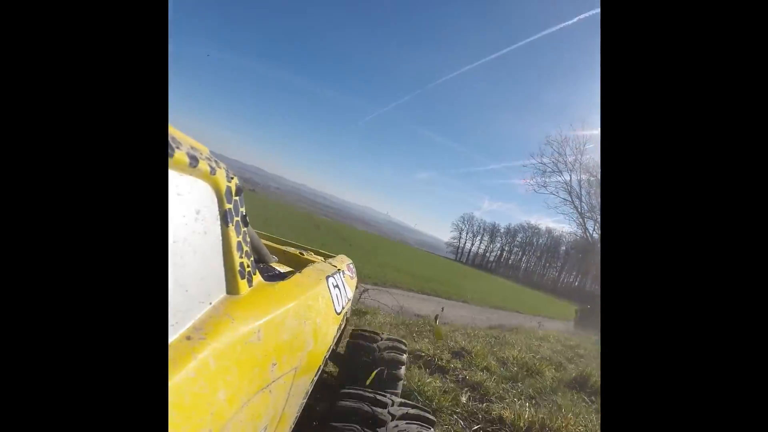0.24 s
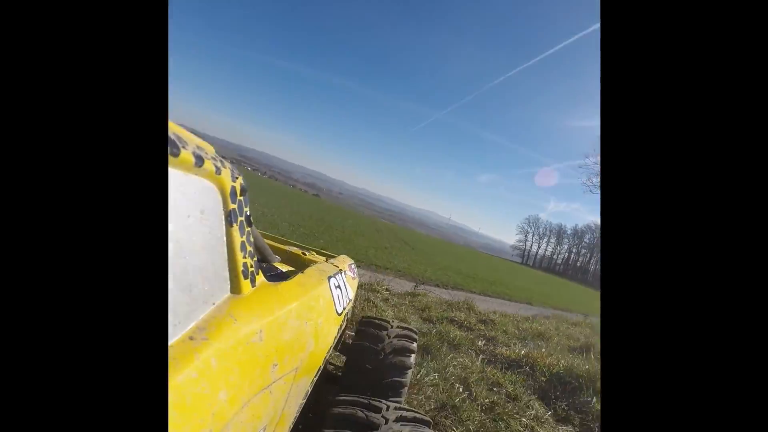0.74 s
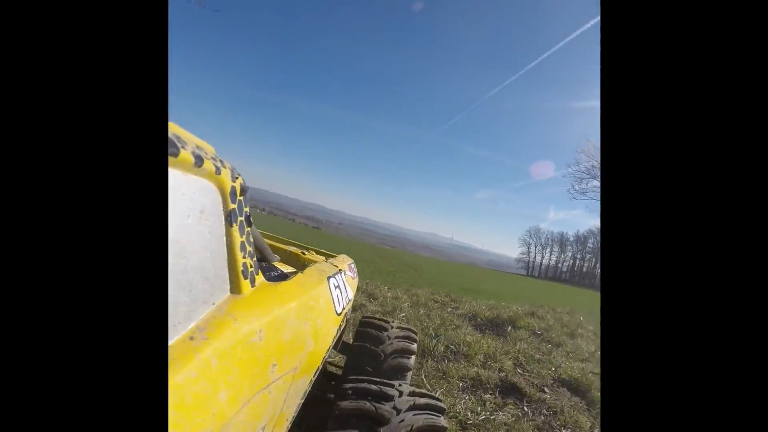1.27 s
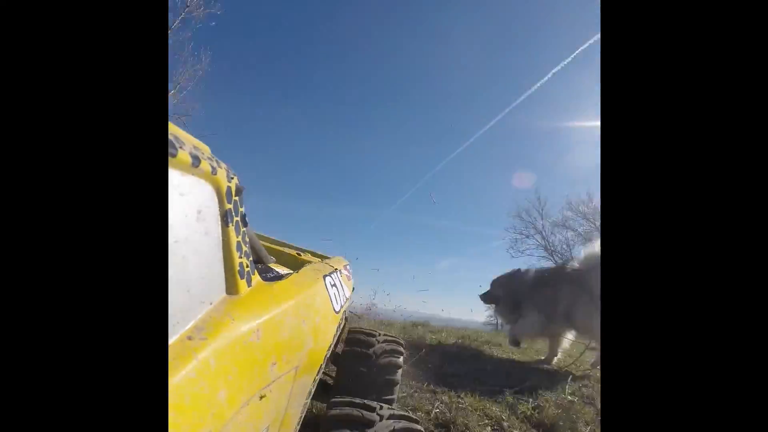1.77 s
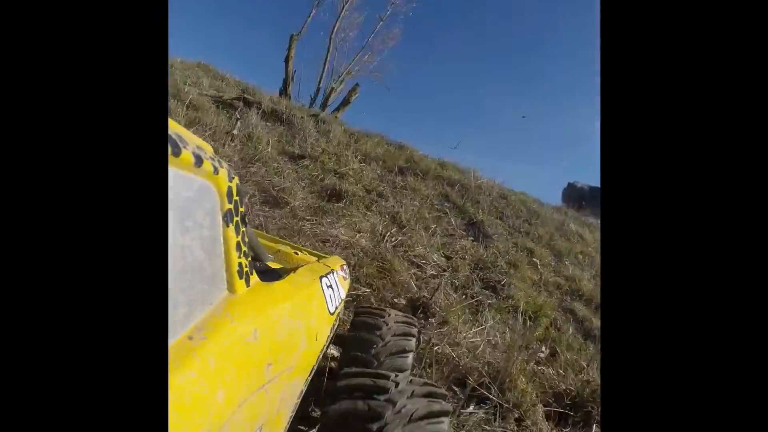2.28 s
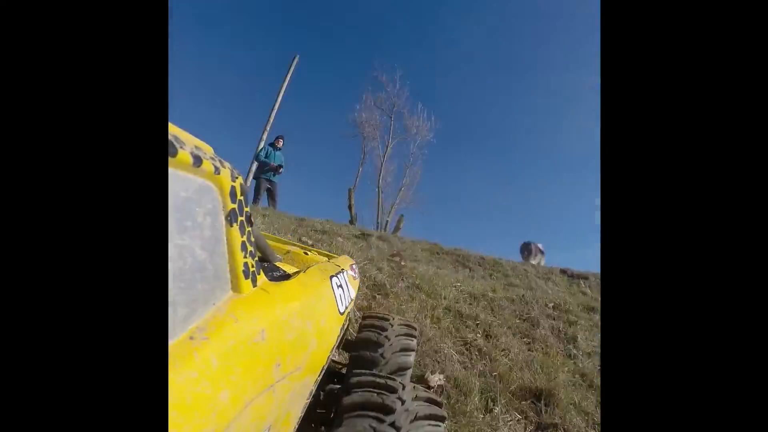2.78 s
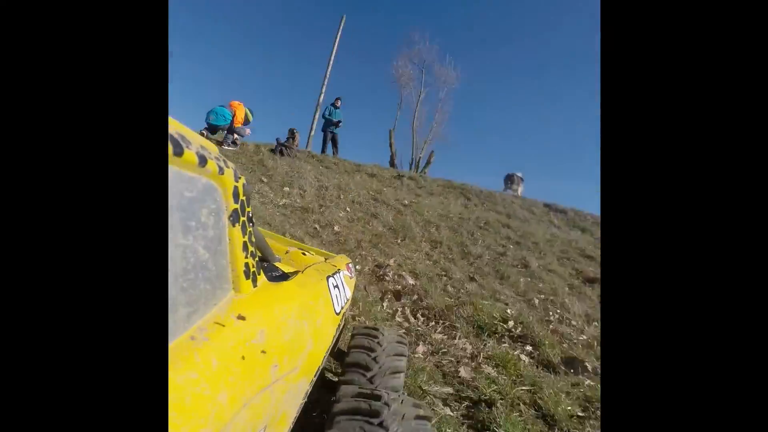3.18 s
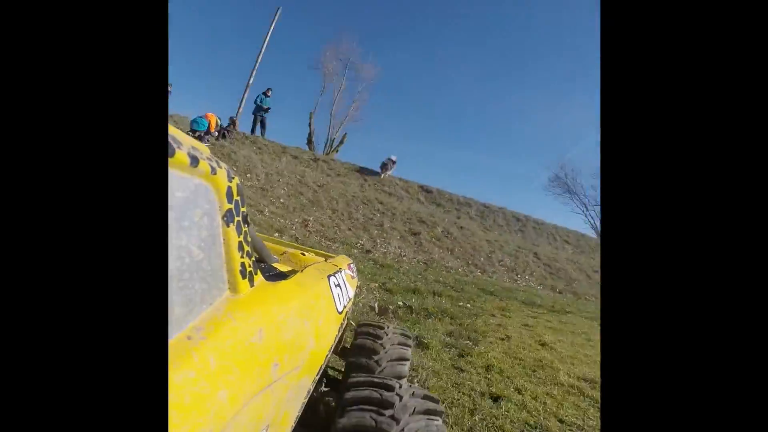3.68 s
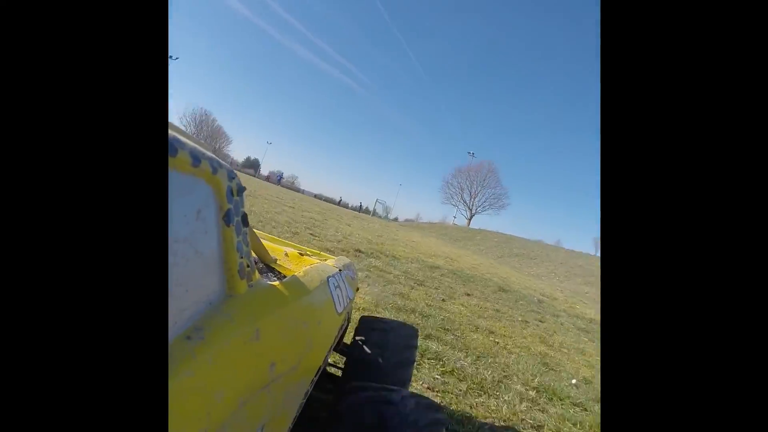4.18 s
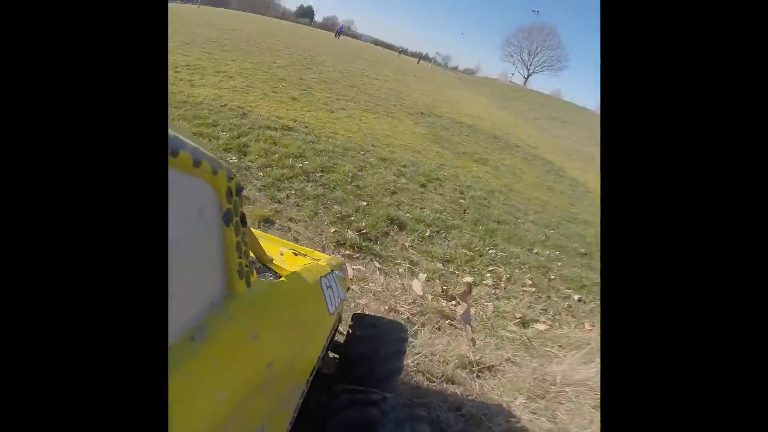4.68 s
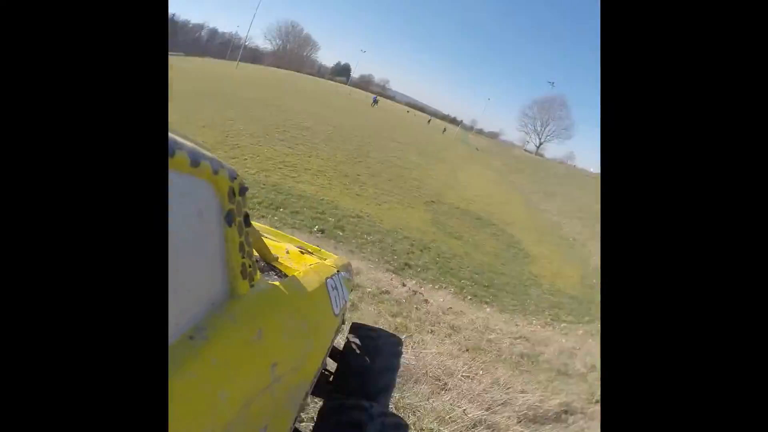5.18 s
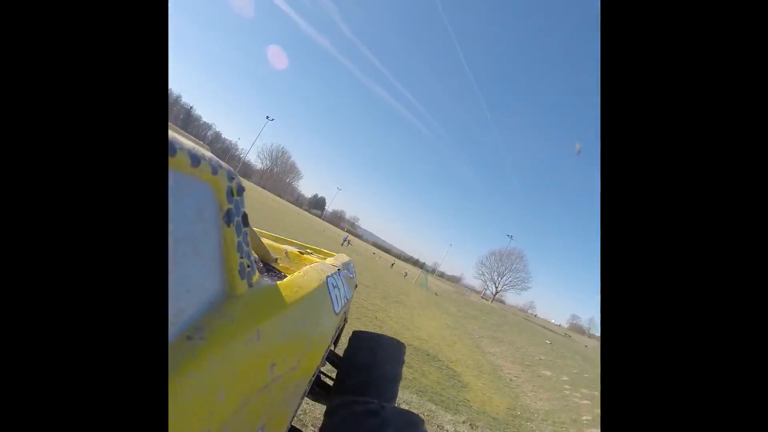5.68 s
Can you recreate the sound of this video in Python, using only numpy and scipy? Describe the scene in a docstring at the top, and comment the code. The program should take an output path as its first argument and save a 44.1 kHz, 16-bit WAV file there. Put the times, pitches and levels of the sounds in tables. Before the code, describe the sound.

A small electric toy truck whines and buzzes in throttle bursts over a bumpy grassy bank, with deep rumble, plastic knocks and metallic jingles.

```python
"""A small electric toy truck buzzes and whines over a grassy bank, heard through a case riding on its body.
Throttle squeezes set the shaft speed, which turns repeating gear patterns, tooth tones and shaft hum.
Filtered noise makes the chassis rumble and tyre boom, and short noise bursts the knocks.
Decaying sine modes make a loose metal part jingle; tiny noise bursts flick grit against the case.
The speed controller adds a thin whistle and the body shell booms under surges of torque."""
import sys
import numpy as np
from scipy import signal
from scipy.fft import rfft, irfft
from scipy.io import wavfile
from scipy.ndimage import uniform_filter1d, map_coordinates

SR = 44100
rng = np.random.default_rng(int(sys.argv[2]) if len(sys.argv) > 2 else 0)


def master_out(mix):
    """Clip the mix to full scale and print it as 16-bit PCM to the path in sys.argv[1]."""
    frames = np.transpose(np.atleast_2d(mix))
    ceiling = np.clip(frames, -1, 1)
    pcm = np.round(ceiling * 32767).astype(np.int16)
    wavfile.write(sys.argv[1], SR, pcm)


N = 261954
TIME = np.arange(N) / SR
CRUISE_HZ = 60  # shaft speed to which speed-dependent levels refer

# Shaft hum on the fast, smooth stretches, before the level of each order: (time [s], level [dB])
HUM_LEVEL = [(4.7, -65), (4.85, -28), (4.97, -22.5), (5.14, -21.5), (5.21, -75), (5.3, -41), (5.44, -23),
             (5.7, -27), (5.94, -29.5)]
# Low response of the shaken case, heard as frame growl and thuds: (frequency [Hz], level [dB per Hz])
FRAME_RESPONSE = [(90, -10.5), (140, -3.5), (180, 0), (220, 2.5), (350, 3.5), (410, -2.5), (475, 7),
                  (530, -2.5), (590, -15), (750, -26.5), (1200, -54.5)]
# High response of the shaken case, heard as gears and clatter: (frequency [Hz], level [dB per Hz])
CASE_RESPONSE = [(450, -25.5), (620, -14.5), (750, -10), (870, 2), (1100, -0.5), (1520, 4.5), (1790, -2),
                 (1950, 1), (2580, -4), (2900, -16.5), (3400, -21.5), (4700, -28), (5500, -33.5),
                 (8000, -39.5), (9000, -52.5), (12500, -68), (15000, -79.5)]
# Squeezes of the throttle: (start [s], end [s], rise [s], load [dB], swell over the squeeze [dB],
# shaft speed at start [turns/s], at end [turns/s], ease [+ revs early, - revs late],
# frame growl [dB re load], whine [dB re gear rattle])
SQUEEZES = [(0.0, 0.232, 0.0081, -34, 0, 35.39, 41.9, 2.5, 0.93, -9),
            (0.694, 0.905, 0.024, -25.5, -2, 37.88, 50.6, 3.5, 0.9, -13.5),
            (1.219, 1.47, 0.058, -24, 3, 33.6, 43.6, 2.5, 1.31, -12),
            (1.465, 1.696, 0.026, -21.5, 2, 43.77, 78, 0.7, -0.71, -4.5),
            (1.705, 1.921, 0.011, -30.5, -5, 74.2, 54, 0.9, -0.14, -7.5),
            (1.95, 2.225, 0.076, -29.5, 0, 48.2, 68.3, -4, 0.099, -10.5),
            (2.52, 3.029, 0.15, -24.5, -0.5, 50.83, 73.88, 1.5, -2.16, -9),
            (3.725, 3.855, 0.042, -22.5, -1.5, 68.7, 75.64, 2, -1, -11),
            (3.879, 4.544, 0.055, -23.5, 3.5, 52.99, 66.96, 1.06, -1.3, -19.5),
            (4.729, 5.189, 0.14, -22.5, 0, 51.02, 73.5, 3, -1.52, -13),
            (5.272, 5.94, 0.16, -22.5, 4, 63.73, 70.86, -0.84, 0.58, -18)]


def amp(db):
    """Decibels to gain."""
    return 10 ** (np.asarray(db) / 20)


def evened(x):
    """Scales to rms 1."""
    return x / np.sqrt(np.mean(x ** 2) + 1e-20)


def curve(rows):
    """Joins the (time, level) rows by straight lines."""
    times, levels = np.transpose(rows)
    return np.interp(TIME, times, levels)


def add(mix, s, sound):
    """Mixes a sound in at time s."""
    part = mix[max(round(s * SR), 0):][:len(sound)]
    part += sound[:len(part)]


def colour(x, points, size=4096):
    """Causal minimum-phase filter with the given spectrum and unit gain for white noise."""
    hz, db = np.transpose(points)
    f = abs(np.fft.fftfreq(size, 1 / SR))
    log_gain = np.log(amp(np.interp(np.log(f + 1), np.log(hz), db)))
    minimum_phase = np.exp(np.conj(signal.hilbert(log_gain)))
    taps = np.fft.ifft(minimum_phase).real[:size // 2]
    return signal.oaconvolve(x, taps / np.linalg.norm(taps))[:len(x)]


def wander(rate_hz):
    """Random drift of rms 1, made of noise below about the given rate."""
    points = 8192
    f = np.fft.rfftfreq(points, TIME[-1] / points)
    spectrum = rfft(rng.standard_normal(points)) / (1 + (f / rate_hz) ** 4)
    slow = irfft(spectrum)
    return evened(np.interp(TIME, np.linspace(0, TIME[-1], len(slow)), slow))


def eased(start, end, ease):
    """Goes from 0 to 1 between two times: mostly early if ease is positive, late if negative."""
    u = np.clip((TIME - start) / max(end - start, .01), 0, 1)
    return np.expm1(-ease * u) / np.expm1(-ease) if ease else u


def lightness():
    """Near 0 with the wheels firmly on the ground, about 1 at the top of a crest."""
    # Crests where the wheels go light: (time [s], half length [s])
    crests = [(0.626, 0.063), (1.8, .04), (2.355, 0.029), (2.937, 0.024), (3.432, 0.049), (3.572, 0.077),
              (4.807, 0.022), (5.475, 0.036)]
    return sum(np.exp(-((TIME - s) / half) ** 2) for s, half in crests)


def shaking(uneven_db=1.0, tyre_boom_db=-6, crest_boom_db=-9, rise_s=.022, fall_s=.028):
    """Chassis bounce and tyre boom in dB: rough ground, and a quick swell at each bump."""
    # Steady shaking from the ground and the buffeting air: (time [s], level [dB])
    ground = [(0, -14), (.4, -22.5), (.9, -18), (1.9, -18), (2.3, -17), (3.2, -16.5), (3.58, -19.5),
              (4.0, -18.5), (4.45, -15.5), (5.12, -15), (5.3, -22.5), (5.94, -20)]
    # Wheels hitting a bump: (time [s], chassis bounce [dB], tyre boom [dB])
    bumps = [(.11, -17, -17), (.17, -9.5, -24), (.78, -6, -28), (1.161, -13.5, -24), (1.4, -22, -13.5),
             (1.481, -9, -17), (1.582, -23.5, -15.5), (1.709, -15.5, -10.5), (2.13, -11.5, -14.5),
             (2.22, -7.5, -13.5), (2.38, -10.5, -33), (2.449, -12, -21), (2.579, -19, -13),
             (2.731, -18, -13), (2.819, -11, -16), (3.019, -21, -13), (3.14, -16.5, -17.5),
             (3.401, -17.5, -16), (3.52, -17, -17.5), (3.679, -14.5, -17), (3.801, -15.5, -11),
             (3.86, -10.5, -17.5), (4.031, -11, -24.5), (4.28, -17.5, -19), (4.42, -11, -21),
             (4.541, -6, -13), (5.18, -11.5, -13.5)]
    steady_db = curve(ground)
    bounce = amp(steady_db + uneven_db * wander(12)) ** 2
    boom_db = steady_db + tyre_boom_db + crest_boom_db * lightness() + uneven_db * wander(14)
    boom = amp(boom_db) ** 2
    t = np.arange(-SR // 10, SR // 5) / SR
    swell = np.exp(-(t / np.where(t < 0, rise_s, fall_s)) ** 2)
    for s, bump_bounce_db, bump_boom_db in bumps:
        add(bounce, s + t[0], (amp(bump_bounce_db) * swell) ** 2)
        add(boom, s + t[0], (amp(bump_boom_db) * swell) ** 2)
    return 10 * np.log10(bounce), 10 * np.log10(boom)


def shaft_speed(coast_ease=2.2):
    """Turns per second: the motor revs with each squeeze and coasts, early at first, until the next."""
    start, end, _, _, _, first, last, ease, _, _ = np.transpose(SQUEEZES)
    speed = np.full(N, first[0])
    for s, e, a, b, k in zip(start, end, first, last, ease):
        speed += (b - a) * eased(s, e, k)
    for s, e, a, b in zip(end, start[1:], last, first[1:]):
        speed += (b - a) * eased(s, e, coast_ease)
    return speed


def effort(speed, coast_db=-36, db_per_octave=5, flutter_db=2.5, crest_db=-1.5, release_s=.011):
    """Load, growl and whine in dB: each squeeze rises, holds and is released over the coasting gears."""
    speed_db = db_per_octave * np.log2(speed / CRUISE_HZ)
    power = amp(coast_db + speed_db + flutter_db * wander(30) + crest_db * lightness()) ** 2
    # growl and whine are averaged by power; these are their coasting values
    growl, whine = 2 * power, -20 * power
    for start, end, rise, db, swell_db, _, _, _, growl_db, whine_db in SQUEEZES:
        gate = eased(start, start + rise, 0) * np.exp(-np.maximum(TIME - end, 0) / release_s)
        push = (gate * amp(db + swell_db * (eased(start, end, 0) - .5))) ** 2
        power = power + push
        growl = growl + growl_db * push
        whine = whine + whine_db * push
    return 10 * np.log10(power), growl / power, whine / power


def rumble(bounce, boom, split_hz=48):
    """The chassis bounces on its booming tyres while air buffets the case."""
    # Chassis bounce and tyre boom: (frequency [Hz], level [dB per Hz])
    rumble_spectrum = [(8, -17), (18, -5), (26, 8), (34, -2), (45, -3.5), (54, -5.5), (68, -4), (82, -11.5),
                       (105, -22.5), (150, -28.5), (200, -25.5), (400, -82), (2000, -110)]
    x = colour(rng.standard_normal(N), rumble_spectrum, size=16384)
    low = signal.sosfiltfilt(signal.butter(4, split_hz, fs=SR, output="sos"), x)
    out = np.zeros(N)
    for band, db in (low, bounce), (x - low, boom):
        # the dampers even out the noise's own swings
        swell = np.sqrt(uniform_filter1d(abs(signal.hilbert(band)) ** 2, size=2200) / 2)
        out += amp(db) * evened(band / swell)
    return out


def grit(load, level_db=4.5, ring_db=6, spray_db=-29, stray_db=-52):
    """Sharp flicks on the case, over stray grains and a fine spray that the tyres throw up under load."""
    # Sharpest flicks of grit and stalks: (time [s], treble peak before level_db [dB])
    hits = [(0.1927, -41), (0.485, -45), (0.93, -46), (1.622, -36.5), (2.1342, -39), (2.218, -39.5),
            (2.751, -39), (2.84, -37), (2.8726, -41), (2.9729, -33), (3.03, -33), (3.1737, -36),
            (3.409, -36.5), (3.523, -39), (3.6279, -36), (3.6817, -36.5), (3.7484, -39), (3.902, -36),
            (4.0047, -40), (4.2343, -33.5), (4.3426, -35.5), (5.018, -33.5)]
    # Spectrum of a grain on the case: (frequency [Hz], level [dB per Hz])
    grain_spectrum = [(1500, -45), (3500, 22.5), (5500, 15), (7000, 16), (9000, 6), (12000, 9),
                      (13500, -18), (15000, -44.5)]
    out, t = np.zeros(N), np.arange(1500) / SR
    fade = amp(-60 * t / .006) + .12 * amp(-60 * t / .03)  # a quick and a fainter, slower decay
    treble_filter = signal.butter(2, 6000, "high", fs=SR, output="sos")
    for s, db in hits:
        snap = rng.standard_normal(len(t)) * fade
        ring_hz = rng.uniform(3420, 4600)  # the ring depends on the spot that is hit
        ring = signal.lfilter(*signal.iirpeak(ring_hz, 3, fs=SR), snap)
        tick = colour(snap + amp(ring_db) * ring, grain_spectrum, size=512)
        treble = signal.sosfilt(treble_filter, tick)
        add(out, s, amp(db + level_db) * tick / abs(treble).max())
    spray = (rng.random(N) < 45 / SR) * amp(4.5 * np.minimum(rng.exponential(1, N), 4))
    strays = (rng.random(N) < 7 / SR) * amp(stray_db + 3 * rng.standard_normal(N))
    strays = signal.oaconvolve(strays, fade)[:N] * rng.standard_normal(N)
    return out + colour(spray * amp(load + spray_db) + strays, grain_spectrum)


def jingles(load, level_db=-3, stray_db=-49, bounce=0.24, load_slope=.55, rattle_db=-43):
    """Blows ring a loose metal part, the hard ones bouncing once; lighter rattles fill the gaps."""
    # Hard blows: (time [s], strength before level_db [dB])
    hard_blows = [(0.096, -25.5), (0.209, -25), (.485, -31), (0.538, -34), (0.756, -29), (0.888, -23),
                  (.933, -32), (1.092, -24.5), (1.236, -30), (1.268, -36), (1.476, -23), (1.581, -18),
                  (1.759, -26), (1.923, -28), (2.012, -27), (2.04, -26), (2.087, -30), (2.568, -27),
                  (2.797, -26), (2.84, -27), (2.87, -24), (3.032, -27), (3.259, -35), (3.328, -34.5),
                  (3.657, -34.5), (3.85, -25), (4.176, -33), (4.278, -23), (5.02, -28), (5.79, -32)]
    # Modes of the loose part: (frequency [Hz], level [dB], 60 dB decay time [s])
    modes = [(3800, -18, .015), (4540, -3, .022), (4690, 0, .028), (4860, -4, .022), (8050, -21, .02)]
    t = np.arange(2500) / SR
    blows = (rng.random(N) < 70 / SR) * amp(stray_db + 3 * rng.standard_normal(N))
    blows *= amp(load_slope * (load - load.mean()))  # it chatters harder under load
    blows += (rng.random(N) < 16 / SR) * amp(rattle_db + 3 * rng.standard_normal(N))
    for s, db in hard_blows:
        lag = rng.uniform(.002, .009)
        add(blows, s, amp([db + level_db]))
        add(blows, s + lag, bounce * amp([db + level_db]))
    attack = 1 - np.exp(-(t / .002) ** 2)
    out = np.zeros(N)
    for hz, db, t60 in modes:
        ring = amp(db - 60 * t / t60) * np.sin(2 * np.pi * (hz * t + rng.random())) * attack
        spot = .5 + rng.random(N)  # each blow lands on another spot and favours other modes
        out += signal.oaconvolve(blows * spot, ring)[:N]
    return out


def knocks(level_db=-1, thud_db=-3, ring_width_hz=450, ring_db=6, t60=0.027, attack_s=0.001):
    """Plastic links hit their stops: a short clatter in the case and a thud in the frame."""
    # Suspension knocks: (time [s], clatter peak before level_db [dB], main ring [Hz],
    # low thud re clatter, before thud_db [dB])
    stops = [(0.041, -16, 1880, -21), (0.064, -13.5, 2580, -28), (0.208, -18.5, 1590, -27),
             (0.221, -12, 1100, -19), (0.463, -14.5, 2610, -4), (0.497, -19, 1452, -8),
             (0.539, -16.5, 1250, -3), (0.56, -13, 1270, -15), (0.735, -4, 1700, -9.5),
             (0.754, -9, 1310, 1), (0.995, -25, 1800, -4), (1.151, -14, 2040, -5), (1.243, -15, 1558, -1),
             (1.826, -13, 1598, 2.5), (2.449, -15, 1900, -3.5), (2.516, -15, 1880, -7),
             (2.57, -13, 1472, -5), (3.031, -20, 1188, -6), (3.173, -14, 1772, -0.5),
             (3.391, -15.5, 1561, 3), (3.407, -11, 1576, -1.5), (3.63, -11, 1855, -6),
             (3.68, -21, 1800, -10), (3.748, -11.5, 1900, -6.5), (3.902, -14, 1473, -6),
             (4.6, -22.5, 1600, 4), (4.64, -19.5, 2020, -12)]
    out, t = np.zeros(N), np.arange(4096) / SR
    envelope = amp(-60 * t / t60) * (1 - np.exp(-t / attack_s))
    for s, db, hz, low_db in stops:
        clatter, thud = rng.standard_normal((2, len(t))) * envelope
        ring = signal.lfilter(*signal.iirpeak(hz, hz / ring_width_hz, fs=SR), clatter)
        crack = colour(clatter + amp(ring_db) * ring, CASE_RESPONSE)
        thud = colour(thud, FRAME_RESPONSE)
        thud_part = amp(low_db + thud_db) * thud / abs(thud).max()
        add(out, s, amp(db + level_db) * (crack / abs(crack).max() + thud_part))
    return out


def shaft_turns(speed, slip_turns):
    """Angle of the motor shaft; play in the gears lets it run a little ahead and behind."""
    return np.cumsum(speed) / SR + slip_turns * wander(21)


def gear_rattle(turns, shake, locked, patchy_db=2.5, impact_hz=1200, spread_db=4.0, size=1024):
    """Uneven teeth repeat their pattern every second turn; loose teeth add random impacts."""
    cycle = [turns / 2 % 1 * size]
    patterns = rng.standard_normal((2, size))
    one, other = (map_coordinates(p, cycle, order=3, mode="grid-wrap") for p in patterns)
    seating = wander(4.9)  # the pattern shifts slowly as the gears reseat
    repeating = evened(one * np.cos(seating) + other * np.sin(seating))
    strikes = rng.choice([-1., 1.], N) * (rng.random(N) < impact_hz / SR)
    impacts = strikes * amp(spread_db * np.minimum(rng.exponential(1, N), 4))
    loose = evened(evened(impacts) + 0.54 * rng.standard_normal(N))
    bumpiness = np.clip(1 + (shake + 14) / 14, .3, 1.3)  # rough ground jolts the mesh
    rattle = np.sqrt(locked) * repeating + np.sqrt(1 - locked) * loose
    return rattle * amp(patchy_db * bumpiness * wander(46))


def booms(speed, shake, q=3):
    """The gear rattle rings a broad resonance of the shell, which swells and dies away."""
    # Booms of the shell twisted by a surge of torque: (start [s], end [s], frequency [Hz], level [dB])
    surges = [(0.717, 0.784, 347, -19.5), (1.252, 1.36, 356, -19.5), (4.086, 4.478, 427.7, -25.5)]
    rattle = gear_rattle(shaft_turns(speed, slip_turns=.003), shake, locked=.7)
    out = np.zeros(N)
    for start, end, hz, db in surges:
        peak = signal.iirpeak(hz, q, fs=SR)
        ring = evened(signal.lfilter(*peak, signal.lfilter(*peak, rattle)))
        out += amp(db) * np.sin(np.pi * eased(start, end, 0)) * ring
    return out


def controller(speed, load, chop_hz=4050, whistle_db=-42, width_hz=130, speed_db=8):
    """The chopped motor current sings; its third harmonic is split in two by the turning poles."""
    # Singing at part throttle: (start [s], end [s], level [dB])
    chops = [(.68, .84, -52), (1.18, 1.29, -59)]
    out = np.zeros(N)
    for start, end, db in chops:
        t = np.arange(0, end - start, 1 / SR)
        tone = np.sin(2 * np.pi * chop_hz * t) * signal.windows.tukey(len(t), .6)
        add(out, start, amp(db) * tone)
    poles = np.cos(2 * np.pi * 5 * shaft_turns(speed, slip_turns=.02))
    third = np.cos(2 * np.pi * 3 * chop_hz * TIME)
    split = np.clip((speed - 45) / 35, 0, .8)  # the split grows with speed
    whistle = third * wander(width_hz) * (1 - split + 1.7 * split * poles)
    return out + amp(load + whistle_db + speed_db * np.log2(speed / CRUISE_HZ)) * whistle


def shaft_hum(speed):
    """Unbalanced shafts hum on low multiples of the motor speed, louder near a body panel's resonance."""
    # Orders of the hum: (multiple of shaft speed, level before panel boost [dB])
    orders = [(2.5, -9), (4, -5), (5, -1), (6, -13), (7, -12)]
    panel_hz, width_hz, panel_db = 182, 6.3, 12.8
    turns = shaft_turns(speed, slip_turns=.004)
    out = np.zeros(N)
    for k, db in orders:
        boost_db = panel_db / (1 + ((k * speed - panel_hz) / width_hz) ** 2)
        out += amp(db + boost_db + 2 * wander(24.0)) * np.cos(2 * np.pi * k * turns)
    return amp(curve(HUM_LEVEL)) * out


def tooth_whine(turns, speed, whine, teeth=22, tooth_db=-6, tooth_db_per_octave=-14):
    """The tooth rate and two overtones; wheels running off centre spread each into a cluster of lines."""
    base = amp(whine)
    # the tooth rate itself leads at low speed
    first = base * amp(tooth_db + tooth_db_per_octave * np.log2(speed / CRUISE_HZ))
    out = np.zeros(N)
    for k, level in (1, first), (2, .9 * base), (3, .35 * base):
        sidebands = sum(wander(14) * np.cos(2 * np.pi * k * side * turns) for side in (.5, 1, 1.5, 2))
        throb = 1 + .45 * wander(35) + (.25 + .3 * k) * sidebands
        out += level * throb * np.cos(2 * np.pi * k * teeth * turns + .4 * k * wander(30))
    return out


def drivetrain(speed, load, growl, whine, shake, high_db=0.5, low_db=-1.0, bright_hz=3200,
               bright_db=3.5, smooth_db=2):
    """Gear rattle and tooth whine reach the microphone through the frame and the case."""
    turns = shaft_turns(speed, slip_turns=.003)
    gears = gear_rattle(turns, shake, locked=.82) + .85 * tooth_whine(turns, speed, whine)
    frame = gear_rattle(turns, shake, locked=.55)
    gears = evened(colour(gears, CASE_RESPONSE))
    frame = evened(colour(frame, FRAME_RESPONSE))
    treble = signal.sosfiltfilt(signal.butter(3, bright_hz, "high", fs=SR, output="sos"), gears)
    # faster teeth strike harder and sound brighter
    gears = gears + treble * (amp(bright_db * np.log2(speed / CRUISE_HZ)) - 1)
    # the growl settles into the hum
    growl_db = growl + low_db - smooth_db * amp(curve(HUM_LEVEL) + 23.5)
    return amp(load) * (amp(high_db) * gears + amp(growl_db) * frame)


def scene():
    """Shaft speed, load and ground shaking steer the layers, which add up in one channel."""
    speed = shaft_speed()
    bounce, boom = shaking()
    shake = 10 * np.log10(amp(bounce) ** 2 + amp(boom) ** 2)
    load, growl, whine = effort(speed)
    ground = rumble(bounce, boom) + grit(load)
    body = jingles(load) + knocks() + booms(speed, shake)
    motor = controller(speed, load) + shaft_hum(speed) + drivetrain(speed, load, growl, whine, shake)
    return (ground + body + motor)[None]


def record(dry, ceiling=0.82, edge_hz=13700):
    """Soft overload rounds off the highest peaks, then a steep low-pass limits the band."""
    held = dry / (1 + (dry / ceiling) ** 6) ** (1 / 6)
    lowpass = signal.firwin(255, edge_hz, window=("kaiser", 8), fs=SR)
    return signal.oaconvolve(held, lowpass[None], "same")


dry = scene()
out = record(dry)
master_out(out)
```